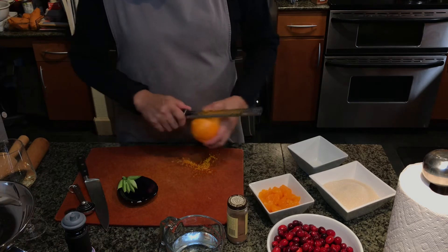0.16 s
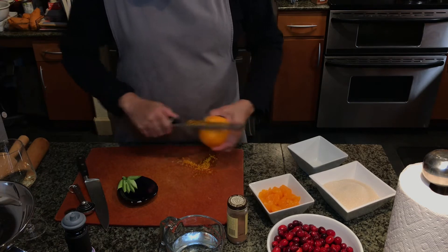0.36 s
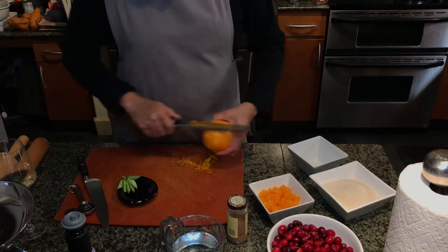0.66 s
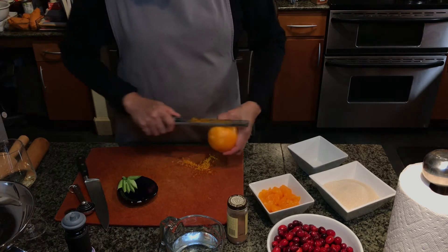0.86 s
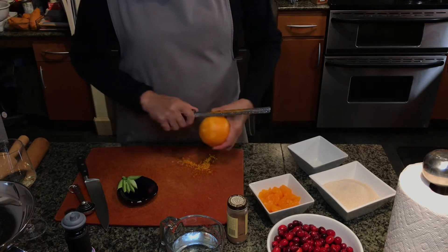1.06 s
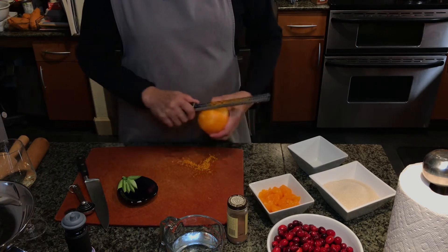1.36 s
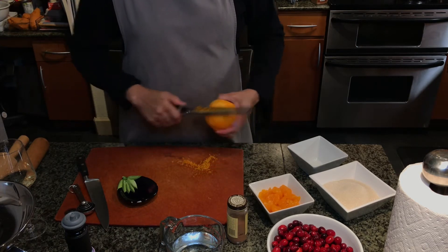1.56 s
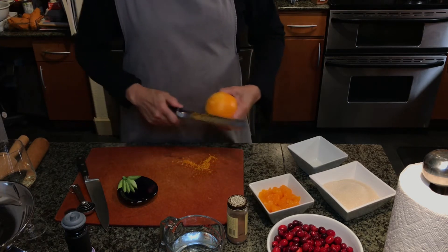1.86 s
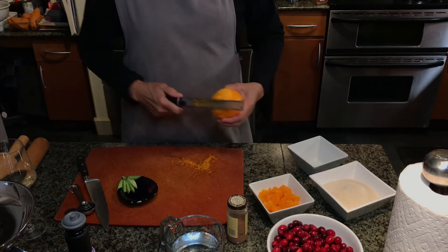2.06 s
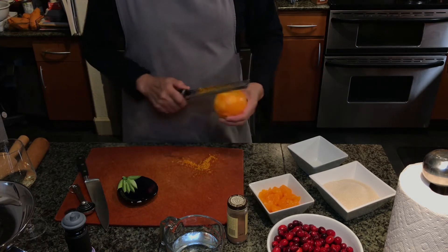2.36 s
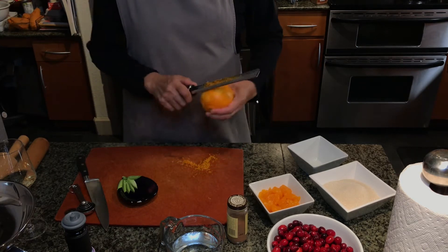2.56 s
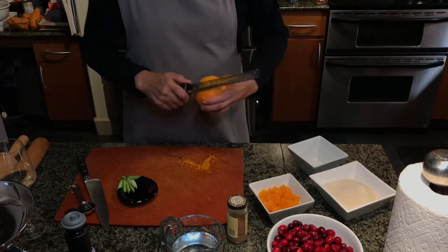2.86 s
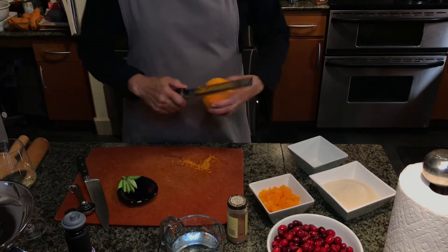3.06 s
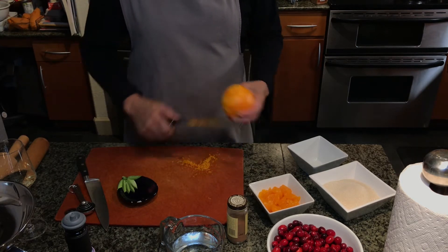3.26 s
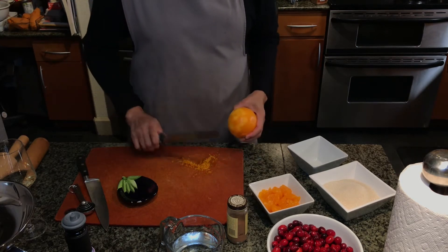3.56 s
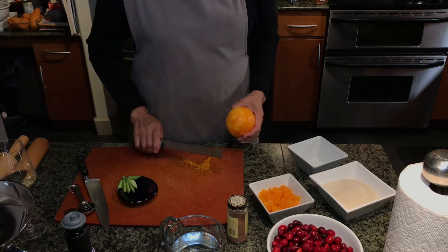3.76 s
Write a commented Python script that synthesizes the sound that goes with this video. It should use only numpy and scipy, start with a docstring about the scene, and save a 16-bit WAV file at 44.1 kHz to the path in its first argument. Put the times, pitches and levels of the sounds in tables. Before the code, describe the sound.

Soft, gritty grating of orange peel with a thin metallic ring runs for about three seconds, pauses briefly, then two sharp clattering knocks hit a board, with a short kitchen echo over low fridge hum.

```python
"""Orange grated, grater rapped on a board

A fine steel grater is drawn to and fro over an orange in a kitchen: firm cutting strokes, lighter returns, as
noise grains through blade resonances. A dry tick and a small clink are heard among them, more ticks just before
the first rap. The grater is rapped twice on a cutting board: clatter, ringing modes and a falling thud.
A refrigerator drones as narrow noise bands, with a wavering hum near 57 Hz; hard walls give a short bright
echo, as decaying noise."""
import sys
import numpy as np
from scipy import signal
from scipy.fft import rfft, irfft, next_fast_len
from scipy.io import wavfile
from scipy.ndimage import uniform_filter1d, map_coordinates

SR = 44100
rng = np.random.default_rng(int(sys.argv[2]) if len(sys.argv) > 2 else 0)


def dump_mix(stems):
    """Bounce the given channels to the path in sys.argv[1] as a 16-bit WAV at rate SR."""
    frames = np.atleast_2d(stems).T  # one column per channel
    limited = np.clip(frames, -1, 1)  # hard clip at full scale
    pcm = np.round(limited * 32767).astype(np.int16)
    wavfile.write(sys.argv[1], SR, pcm)


N = 171990  # samples

# grater blade resonances: centre_hz, width_hz, level_db (relative)
BLADE_MODES = [(1970, 360, 5), (2490, 200, 3), (2850, 220, -1), (3060, 140, -1), (3340, 170, 0.5),
               (3560, 130, -0.5), (4000, 130, -9), (4250, 140, 1.5), (4200, 140, -5), (5430, 200, -39),
               (6800, 100, 11)]


def amp(db):
    """Decibels to amplitude factor."""
    return 10 ** (np.asarray(db) / 20)


def unit(x):
    """Scale to rms 1."""
    return x / np.sqrt(np.mean(x ** 2) + 1e-20)


def along(points, hz):
    """Interpolate (Hz, value) points on a log frequency axis."""
    point_hz, value = np.transpose(points)
    return np.interp(np.log(hz + 1), np.log(point_hz + 1), value)


def filtered(x, response):
    """Multiply the spectrum of x by a complex response of frequency."""
    size = next_fast_len(len(x) + 8192)
    spectrum = rfft(x, size) * response(np.fft.rfftfreq(size, 1 / SR))
    return irfft(spectrum, size)[:len(x)]


def coloured(x, points):
    """Shape the spectrum of x by (Hz, dB) points; rms 1."""
    return unit(filtered(x, lambda hz: amp(along(points, hz))))


def peaks(rows):
    """Response of parallel second-order resonances of alternating sign."""
    def response(f):
        total = 0
        for k, (centre_hz, width_hz, db) in enumerate(rows):
            damping = 1j * f * width_hz
            total = total + (-1) ** k * amp(db) * damping / (centre_hz ** 2 - f ** 2 + damping)
        return total
    return response


def add(track, start_s, sound):
    """Mix a sound in at a time, trimmed to the track."""
    i = round(start_s * SR)
    part = sound[max(-i, 0):max(len(track) - i, 0)]
    track[max(i, 0):][:len(part)] += part


def drifting(hz, blur_rad, t):
    """Sine whose phase takes a smoothed random walk, blur_rad per sample."""
    walk = np.cumsum(blur_rad * rng.standard_normal(len(t)))
    return np.sin(2 * np.pi * hz * t + uniform_filter1d(walk, size=200))


def rings(modes, blur_rad_per_khz, t):
    """Modes struck at once, decaying exponentially; each level varies at random by 2 dB sd."""
    total = np.zeros(len(t))
    for hz, db, t60_s in modes:
        decay = amp(db + rng.normal(0, 2) - 60 * t / t60_s)
        total += decay * drifting(hz, blur_rad_per_khz * hz / 1e3, t)
    return total


def kitchen():
    """Steady air noise, refrigerator tones as resonated noise, and a low hum that wavers."""
    # room tone colour: freq_hz, level_db (relative)
    air_colour = [(20, -30), (60, -11), (120, -9.5), (250, -11), (400, -19), (700, -22), (1000, -21.5),
                  (1800, -22), (3200, -24.5), (6000, -27), (16000, -31.5)]
    # refrigerator tones: centre_hz, width_hz (of one of two passes), level_db
    fridge_tones = [(30.4, 7.1, -76), (85.5, 8.8, -65.5), (115.2, 7, -70.5), (135.4, 15.6, -66),
                    (167.9, 25, -68.5), (209.4, 34, -67), (295, 37, -74), (418.7, 17, -77.5),
                    (481, 36, -77), (560, 110, -66), (625.2, 30, -72), (1220, 46, -73.5), (1893, 21, -75.5),
                    (3230, 31, -78)]
    # slow drift of the tones' level: time_s, gain_db
    fridge_drift = [(0, 2.5), (1, .6), (2, -0.5), (3, -1.5), (3.9, 1.5)]
    # wavering hum near 57 Hz: time_s, level_db
    hum_levels = [(0.0, -62.5), (0.63, -56), (0.68, -62), (0.78, -56), (1.5, -58.5), (1.56, -68),
                  (1.74, -53), (1.84, -62.5), (1.92, -56.5), (2.4, -63.5), (2.45, -53), (2.53, -78),
                  (2.56, -60), (2.8, -70), (2.93, -63), (3.01, -72), (3.18, -61), (3.5, -59.5)]
    air_db, hum_hz, hum_blur_rad = -60.5, 57.1, 0.0091

    t = np.arange(N) / SR
    air = amp(air_db) * coloured(rng.standard_normal(N), air_colour)
    tones = np.zeros(N)
    for hz, width_hz, db in fridge_tones:
        band = peaks([(hz, width_hz, 0)])
        tones += amp(db) * unit(filtered(rng.standard_normal(N), lambda f: band(f) ** 2))
    tones *= amp(np.interp(t, *np.transpose(fridge_drift)))
    hum = unit(drifting(hum_hz, hum_blur_rad, t))
    hum *= amp(np.interp(t, *np.transpose(hum_levels)))
    return air + tones + hum


def grains(n, flutter_db):
    """Teeth biting peel: dense tiny pulses of uneven size plus noise, under a quick flutter."""
    grains_per_s, grain_spread_db, noise_share = 5000, 2.5, 0.76
    hits = rng.random(n) < grains_per_s / SR
    sizes = amp(grain_spread_db * np.clip(rng.standard_normal(n), -2, 2))
    bites = hits * rng.standard_normal(n) * sizes
    # random level points 300 samples apart, joined smoothly
    flutter = map_coordinates(rng.standard_normal(n // 300 + 4), [np.arange(n) / 300])
    return (unit(bites) + noise_share * rng.standard_normal(n)) * amp(flutter_db * np.clip(flutter, -2, 2))


def blade_ring(catch, ring_hz, spread):
    """Blade resonances excited by grains, strongest near ring_hz; their powers add."""
    held = [(hz, width_hz, db - 4.8 * (np.log(hz / ring_hz) / spread) ** 2)
            for hz, width_hz, db in BLADE_MODES]
    return unit(filtered(catch, lambda f: np.sqrt(sum(np.abs(peaks([row])(f)) ** 2 for row in held))))


def strokes():
    """Each stroke swells and fades; the airy rasp comes a little before the ring of the blade."""
    # strokes: fullest_s, rise_s, fall_s, ring_db, ring_hz, ring_spread (share of ring_hz), rasp_db, fizz_db
    stroke_rows = [(.005, .05, 0.053, -69, 3280, 0.12, -58.5, -67),
                   (.125, 0.075, 0.08, -55, 3340, .18, -50.5, -58.5),
                   (.29, 0.042, 0.075, -69, 3480, 0.12, -62.5, -67.5),
                   (.44, 0.078, 0.067, -56, 3470, 0.15, -54, -58),
                   (.6, 0.085, 0.08, -66.5, 3520, 0.11, -61, -62),
                   (.74, 0.068, 0.075, -57, 3620, 0.14, -57, -61),
                   (0.891, 0.074, 0.076, -70, 3470, 0.12, -62.5, -64.5),
                   (1.05, 0.093, 0.088, -64, 3400, 0.15, -59.5, -64.5),
                   (1.19, 0.042, 0.085, -68, 3250, .12, -60.5, -60.5),
                   (1.34, 0.073, 0.069, -57, 3720, 0.22, -55, -61.5),
                   (1.51, 0.067, 0.076, -67, 3380, 0.16, -63, -64.5),
                   (1.641, 0.11, 0.11, -58.5, 3270, 0.26, -57, -62),
                   (1.79, 0.085, 0.057, -63.5, 3160, 0.17, -66, -69),
                   (1.951, 0.067, 0.048, -56, 3040, 0.093, -56.5, -65.5),
                   (2.1, 0.071, 0.071, -65.5, 3050, 0.12, -62.5, -67),
                   (2.239, 0.089, 0.073, -62.5, 3300, 0.18, -60, -70),
                   (2.41, 0.074, 0.087, -78, 3600, 0.17, -64.5, -67),
                   (2.55, 0.089, 0.061, -58.5, 3400, 0.15, -57.5, -67.5),
                   (2.7, 0.076, 0.064, -68, 2950, 0.27, -77, -78.5),
                   (2.85, 0.071, 0.054, -51, 3010, 0.16, -56, -63),
                   (2.98, 0.03, 0.071, -74, 3130, 0.18, -62, -64.5),
                   (3.096, 0.054, 0.051, -59, 3000, 0.22, -62.5, -71)]
    # rasp colour: freq_hz, level_db (relative)
    rasp_colour = [(900, -15), (1300, -1.5), (2000, -2), (4000, 1), (5500, 0), (7000, 0.5), (7600, -7.5),
                   (9000, -13.5), (10500, -15)]
    # top fizz colour: freq_hz, level_db (relative)
    fizz_colour = [(6000, -24), (8500, 4.5), (10400, -1.5), (12000, 4), (16000, -3)]
    rasp_leads_s, rasp_flutter_db, ring_flutter_db = 0.0097, 1.7, 2.4

    out = np.zeros(N)
    t = np.arange(-SR // 5, SR // 5) / SR  # 0 = fullest

    def swell(u, rise_s, fall_s):
        phase = np.clip(u / np.where(u < 0, rise_s, fall_s), -1, 1)
        return np.cos(np.pi / 2 * phase) ** 1.32

    for fullest_s, rise_s, fall_s, ring_db, ring_hz, spread, rasp_db, fizz_db in stroke_rows:
        bite = grains(len(t), rasp_flutter_db)
        catch = grains(len(t), ring_flutter_db)
        ring = amp(ring_db) * blade_ring(catch, ring_hz, spread)
        hiss = amp(rasp_db) * coloured(bite, rasp_colour) + amp(fizz_db) * coloured(bite, fizz_colour)
        stroke = ring * swell(t, rise_s, fall_s) + hiss * swell(t + rasp_leads_s, rise_s, fall_s)
        add(out, fullest_s + t[0], stroke)
    return out


def tail(colour):
    """Wall echo of one click: noise building up quickly, each frequency dying at its own speed."""
    # wall reverberation: freq_hz, t60_s
    wall_decay = [(100, 0.69), (260, 0.28), (700, 0.52), (1840, 0.41), (4850, 0.42), (12800, 0.32)]
    build_s = 0.0027
    hz, t, bins = signal.stft(rng.standard_normal(SR // 2), SR, nperseg=256)
    level_db = along(colour, hz)[:, None] - 60 * t / along(wall_decay, hz)[:, None]
    x = signal.istft(bins * amp(level_db), SR, nperseg=256)[1]
    build = 1 - np.exp(-np.arange(len(x)) / SR / build_s)
    return x * build / np.linalg.norm(x)  # energy 1 before the build-up


def touches():
    """Dry ticks as decaying coloured noise, and one small clink of ringing metal modes."""
    # light touches: start_s, level_db, t60_s, treble_db
    tick_rows = [(0.9413, -42, 0.0032, -13), (3.4045, -37.5, 0.0059, -6.5), (3.5449, -38, 0.014, -27),
                 (3.5518, -43, 0.022, -25)]
    # small metal clink modes: freq_hz, level_db (relative), t60_s
    clink_modes = [(2401, -0.5, 0.47), (2410, -3.5, .45), (2960, 0, 0.12), (4200, 8, .15), (4420, -3, .25),
                   (6170, -14, 0.089), (8600, -6, .2), (8900, -10, .1), (9200, -13, .1), (9550, -14, 0.13)]
    clink_s, clink_db, clink_blur_rad_per_khz, clink_build_s = 1.575, -56, .013, .007

    out, t = np.zeros(N), np.arange(SR // 2) / SR
    for start_s, db, t60_s, treble_db in tick_rows:
        colour = [(700, -24), (2200, -9), (5500, -10), (9000, treble_db), (16000, treble_db - 7)]
        add(out, start_s, amp(db - 60 * t / t60_s) * coloured(rng.standard_normal(len(t)), colour))
    clink = rings(clink_modes, clink_blur_rad_per_khz, t) * (1 - np.exp(-t / clink_build_s))
    add(out, clink_s, amp(clink_db) * clink)
    return out


def thud(start_hz, t):
    """Counter thud: a decaying sine whose pitch falls exponentially."""
    t60_s, falls_to, fall_s, build_s = 0.38, 0.39, 0.078, .008  # falls_to: share of start_hz
    hz = start_hz * (falls_to + (1 - falls_to) * np.exp(-t / fall_s))
    sine = np.sin(2 * np.pi * np.cumsum(hz) / SR)
    return amp(-60 * t / t60_s) * sine * (1 - np.exp(-t / build_s))


def raps():
    """Blade lands edge-on: ms of clatter, steel and board ring out, the counter thuds, the walls answer."""
    # raps: start_s, clatter_db, clatter_length_s, blade_db, board_db, echo_db, thud_db, thud_start_hz
    rap_rows = [(3.558, -15, 0.0059, -19.5, -25.5, -28, -34, 151),
                (3.7412, -19, 0.006, -29, -29.5, -31, -41, 108.5)]
    # clatter colour: freq_hz, level_db (relative)
    clatter_colour = [(120, -29), (200, -14), (899, -5), (1350, -19), (1650, 0.5), (2560, -5), (2860, 1.5),
                      (4040, -2.5), (4270, -5), (5040, -3.5), (5520, 1.5), (8120, -7), (16000, -14)]
    # cutting board modes: freq_hz, level_db (relative), t60_s
    board_modes = [(310, -0.5, 0.059), (581, -7, 0.21), (847, -7, 0.17), (898, -1, 0.22), (945, -5, 0.32),
                   (958, -8, 0.14), (1549, -1.5, 0.13), (1780, -31, 0.087), (2130, -28, 0.07)]
    # colour of a rap's echo: freq_hz, level_db (relative)
    echo_colour = [(80, -30), (150, -6), (220, -15), (300, -9), (400, -28), (580, -5.5), (740, -11),
                   (920, -6), (1200, -10), (1550, -10), (3000, -8.5), (4700, -14), (5450, -11),
                   (6100, -15.5), (6800, -9), (7600, -17), (9000, -17), (12000, -23), (16000, -31)]
    clatter_t60_s, clatter_sag_db = 0.018, 2
    width_factor = 0.44  # blade resonances ring narrower than in the strokes
    board_blur_rad_per_khz, board_build_s, thud_leads_s = .007, .003, 0.0145

    out, t = np.zeros(N), np.arange(SR // 2) / SR
    narrow_modes = [(hz, width_hz * width_factor, db) for hz, width_hz, db in BLADE_MODES]
    for start_s, clatter_db, length_s, blade_db, board_db, echo_db, thud_db, thud_hz in rap_rows:
        # slight sag over the clatter's length, then a fast decay
        sag_db = clatter_sag_db * np.minimum(t / length_s, 1)
        shape = amp(-60 * np.maximum(t - length_s, 0) / clatter_t60_s - sag_db)
        noise = rng.standard_normal(len(t))
        add(out, start_s, amp(clatter_db) * coloured(noise, clatter_colour) * shape)

        steel = filtered(noise * shape, peaks(narrow_modes))
        add(out, start_s, amp(blade_db) * steel / np.abs(steel).max())

        board = rings(board_modes, board_blur_rad_per_khz, t) * (1 - np.exp(-t / board_build_s))
        add(out, start_s, amp(board_db) * board)

        echo = tail(echo_colour)
        early_rms = np.sqrt(np.mean(echo[:SR // 20] ** 2))  # first 50 ms
        add(out, start_s, amp(echo_db) * echo / early_rms)

        add(out, start_s - thud_leads_s, amp(thud_db) * thud(thud_hz, t))
    return out


def scene():
    """Grating and touches with their wall echo, the raps, and the room tone."""
    wall_db = -3
    near = strokes() + touches()
    echo = signal.fftconvolve(near, tail([(20, 0), (20000, 0)]))[:N]
    return (near + amp(wall_db) * echo + raps() + kitchen())[None]


def record(dry):
    """Microphone treble dips and second-order low cut; then nothing is kept above about 16 kHz."""
    # microphone dips: centre_hz, width_hz, depth (0-1)
    mic_dips = [(7700, 130, 0.05), (10440, 170, 0.39)]
    low_cut_hz, top_hz = 24, 15850

    def response(f):
        dips = 1 - sum(depth * peaks([(hz, width_hz, 0)])(f) for hz, width_hz, depth in mic_dips)
        low_cut = (1j * f / (low_cut_hz + 1j * f)) ** 2
        band_limit = np.clip((top_hz + 150 - f) / 300, 0, 1) ** 2  # 300 Hz wide slope
        return dips * low_cut * band_limit

    return filtered(dry[0], response)[None]


dry = scene()
out = record(dry)
dump_mix(out)
```